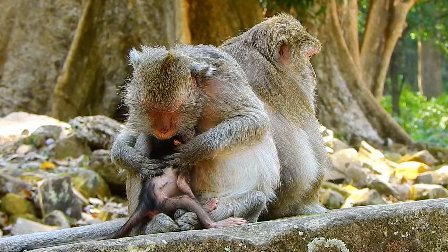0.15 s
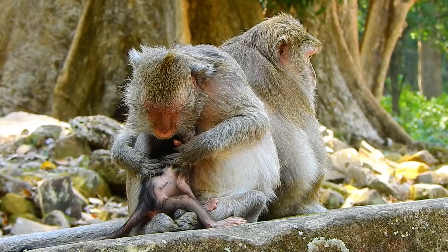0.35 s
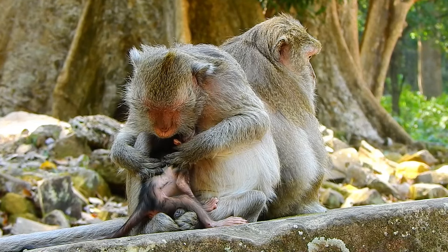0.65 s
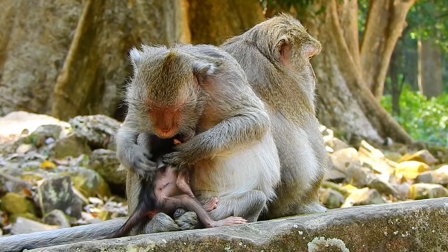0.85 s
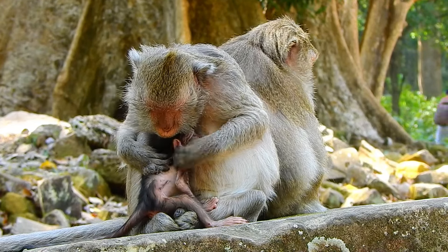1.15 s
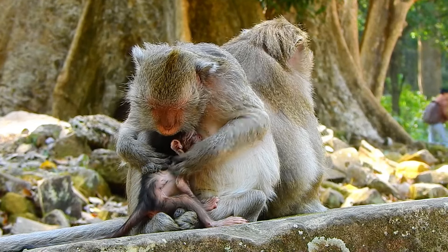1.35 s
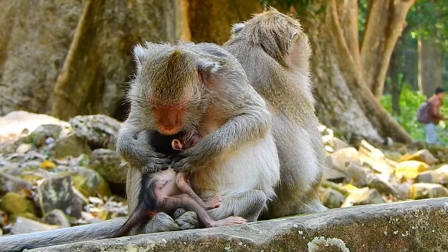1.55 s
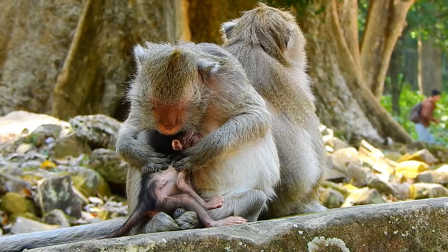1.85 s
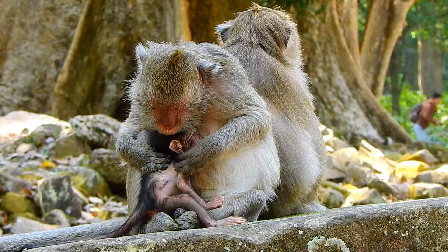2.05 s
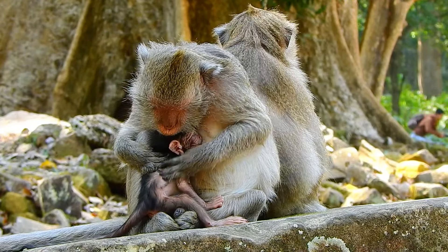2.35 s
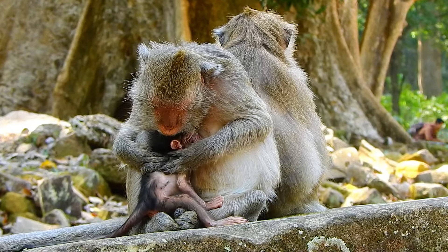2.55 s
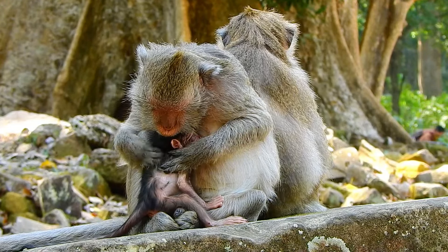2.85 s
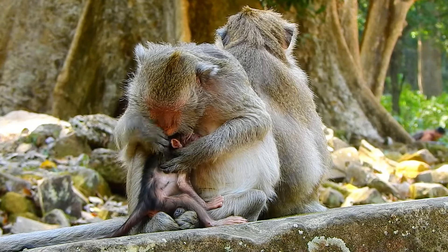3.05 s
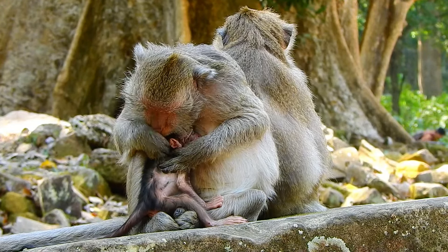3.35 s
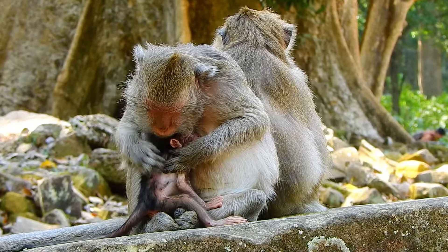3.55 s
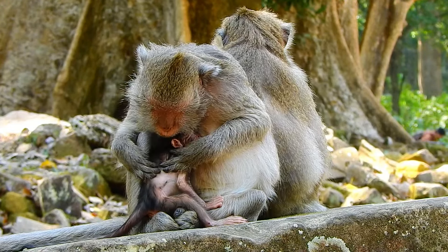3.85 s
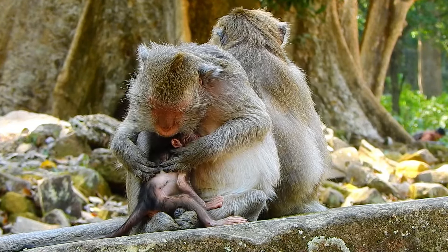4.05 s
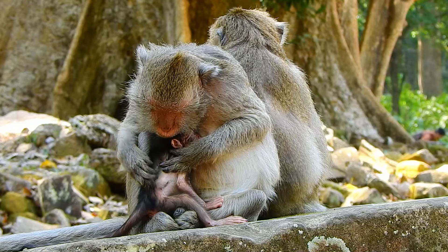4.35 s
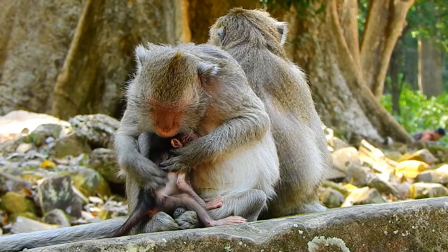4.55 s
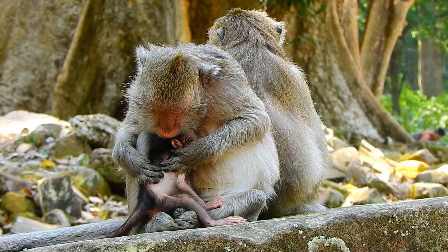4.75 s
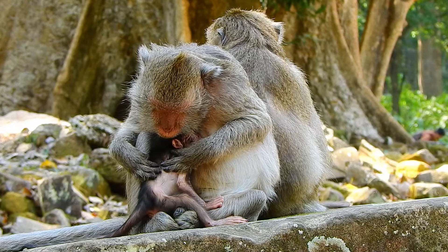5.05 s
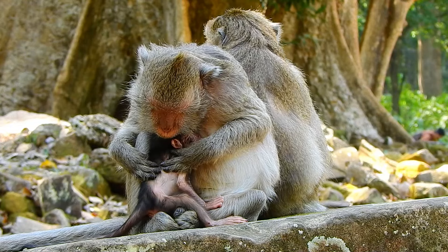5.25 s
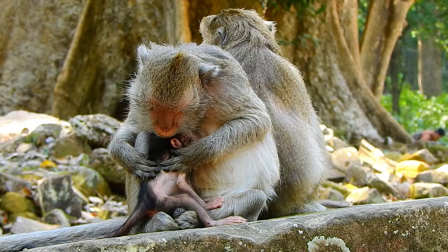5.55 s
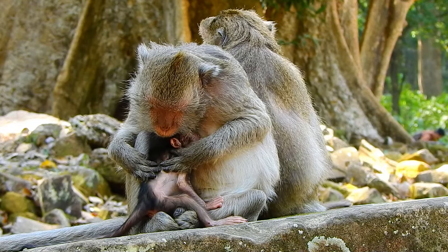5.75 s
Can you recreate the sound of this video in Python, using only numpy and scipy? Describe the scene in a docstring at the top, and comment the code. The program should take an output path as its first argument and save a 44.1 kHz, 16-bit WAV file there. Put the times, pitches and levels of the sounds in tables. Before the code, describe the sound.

Dry scuffs of fur and leaves, short piercing monkey squeaks, and scattered crisp clicks that grow louder later, close up in quiet, lightly echoing woodland.

```python
"""A rustling scuff opens over a very quiet hush; sharp smacks and ticks and thin squeaks near 3 kHz soon join it.
Macaques call and shift on fur, stone and dry leaves on a ledge, heard by a closely spaced microphone pair.
Scuffs are bursts of tiny slips; smacks and two squeak onsets are crackling impulses; all excite four resonances.
Squeaks and one clearer chirp are gliding sines roughened by random pitch and strength.
All but the hush feed a diffuse tail, made of fading noise, that lasts a third to half a second."""
import sys
import numpy as np
from scipy import signal
from scipy.fft import rfft, irfft, next_fast_len
from scipy.io import wavfile

SR = 44100
rng = np.random.default_rng(int(sys.argv[2]) if len(sys.argv) > 2 else 0)


def dump(signal):
    """Clip the signal to [-1, 1] and save it as 16-bit WAV at the path in sys.argv[1]."""
    limited = np.clip(np.atleast_2d(signal).T, -1, 1)
    pcm = np.round(limited * 32767).astype(np.int16)
    wavfile.write(sys.argv[1], SR, pcm)


N = 260631

# Spectrum of the still air, in relative level: frequency_hz, density_db
AIR_SPECTRUM = [(15, -5.5), (30, -2.5), (60, 3), (95, -2.5), (160, -16.5), (300, -13.5), (1000, -8.5),
                (3000, -6.5), (5000, -26.5), (7000, -30.5), (10000, -31), (15000, -39.5)]
# Left-right correlation of the still air: frequency_hz, correlation (-1 to 1)
AIR_CORRELATION = [(60, 0.9), (250, 0.52), (1000, 0.12), (3000, 0.092)]
AIR_DB = -76.5  # rms

# Rubbing contacts: start_s, length_s, level_db (before mix), rasp_hz, weight_db, left_minus_right_db
SCUFF_STROKES = [(-.045, 0.14, -47.5, 2960, 4.5, 2.5), (0.255, 0.077, -49.5, 3290, 2.5, 0),
                 (0.282, 0.15, -52.5, 3280, 8, 1.5), (0.373, 0.08, -41, 2930, 4.5, 0),
                 (.402, 0.11, -40, 3030, 9.5, 1), (0.594, 0.049, -55.5, 2950, 3, 3),
                 (.828, 0.087, -49, 3540, -23.5, 0), (1.08, .09, -55.5, 3190, 0.5, 7.5),
                 (1.269, 0.2, -60.5, 3520, 12, -.5), (1.412, 0.066, -47, 3180, 3, -1),
                 (1.508, 0.082, -61.5, 2830, -2, -8), (1.757, 0.095, -49.5, 2960, -1, 1.5),
                 (1.841, 0.16, -53.5, 3220, 1, 0), (2.438, 0.099, -59, 2850, -4.5, -5),
                 (2.681, 0.08, -74, 3300, 14, 6), (2.715, 0.22, -63.5, 3630, 8, -1.5),
                 (2.826, 0.14, -51.5, 3520, 3.5, 1.5), (2.997, .068, -31.5, 3150, -14, -1.5),
                 (3.207, 0.068, -50.5, 3100, 0.5, 4.5), (3.675, 0.16, -61.5, 2800, -1.5, 1.5),
                 (3.826, 0.24, -50, 3070, 1, 0.5), (4.166, 0.089, -73.5, 2900, 12.5, 4.5),
                 (4.321, 0.099, -41.5, 3180, -8, -7.5), (4.397, 0.15, -57, 3550, -10, -10),
                 (4.534, 0.11, -33.5, 3130, -2, -4), (4.665, .065, -60.5, 3240, 13, -5.5),
                 (4.78, 0.089, -57.5, 3100, 7.5, 5.5), (5.017, 0.071, -51.5, 2920, -2, 5),
                 (5.145, 0.2, -56, 3120, -4.5, 2), (5.295, 0.098, -47.5, 3160, -6, 4.5),
                 (5.518, .105, -47.5, 2820, 0.5, 3), (5.614, 0.099, -38.5, 2970, -1.5, 9.5)]
# Impulsive contacts, and the sharp onsets of two squeaks near 2.2 and 2.4 s:
# snap_s, level_db (before mix), ring_hz, weight_db, sharpness_db (extra hiss),
# crackle_decay_s, left_minus_right_db, left_lag_samples
SNAPS = [(.3829, -37, 3150, 18, 10.5, 0.0045, 1.5, -5.5), (.603, -54.5, 3150, 22.5, -2.5, 0.016, 7, 2.5),
         (.834, -49.5, 3270, -6, 18, 0.036, 2, 4), (1.099, -45, 3270, -5.5, 1.5, 0.0012, -7.5, -2.5),
         (1.173, -50, 2930, 5, -7, 0.0032, -0.5, 5.5), (1.284, -61, 3320, -4, 11.5, 0.0047, 10, 2.5),
         (1.422, -46.5, 3450, 8.5, 11.5, .012, -7, 0.5), (1.45, -49.5, 2660, 16.5, -9, .0033, -3.5, 3),
         (1.711, -45.5, 2930, -2.5, 1, 0.015, -6, 6.5), (2.197, -54.5, 2810, -6, -12.5, 0.042, -4, -3),
         (2.406, -33.5, 2990, -18.5, -10, 0.008, -7.5, 5), (2.459, -43, 2840, -20, -12, 0.029, -2, 4.5),
         (3.002, -28.5, 2710, -7, 0.5, 0.007, -6.5, 5), (3.221, -42, 3040, -7.5, -9, .0029, 2, 7),
         (3.4064, -23, 3130, -12.5, 0, 0.0018, -5.5, 5.5), (3.4132, -27, 3120, -21.5, 7, 0.00087, 1.5, 4.5),
         (3.537, -32, 3050, -13, -2, 0.01, -3, 6), (3.851, -47.5, 3380, 5, -9, 0.0011, -4, -4),
         (3.967, -33.5, 3000, 8.5, 0, 0.0077, 3, -5), (4.084, -45, 3030, -2.5, 0, 0.012, -4.5, 6.5),
         (4.43, -47.5, 3460, -1.5, 13, 0.0066, -11, 9.5), (4.549, -42, 3200, -12, 3.5, 0.061, -10, 7.5),
         (4.921, -58, 2820, 17, -17, 0.011, 6, 4), (5.127, -38, 3450, -13.5, -5, 0.0006, -15, 4),
         (5.355, -51.5, 3220, 18, 2, 0.0098, 24, 1), (5.53, -55, 2850, 17, 3, 0.00077, 2, -5.5),
         (5.64, -36, 3020, -7.5, -19, 0.0028, -1, -5.5), (5.673, -41.5, 2960, 2.5, 4, 0.001, -2, 4),
         (5.705, -28, 3020, -13.5, -2.5, .008, -4, 7)]
# Hoarse calls: start_s, rise_s, length_s, pitch_hz (mid-call), glide_hz_per_s, peak_db
SQUEAK_GLIDES = [(0.446, 0.024, .11, 3190, -1400, -42.5), (0.61, 0.034, 0.13, 3058, -1800, -53),
                 (0.667, 0.017, .09, 2760, -2400, -51), (1.095, .003, .009, 3126, -9000, -39),
                 (1.706, 0.0069, .055, 2914, -3500, -42.5), (2.175, 0.025, .11, 3030, -3300, -47),
                 (2.264, 0.063, 0.2, 2937, 2403.5, -63), (2.398, .01, .02, 2933, -6000, -35.5),
                 (4.084, 0.0067, .14, 3017, -2000, -57.5), (4.238, 0.028, 0.1, 3055, 3996, -62)]
# Path of the one clear chirp, which dips, swells and flicks upward: time_s, pitch_hz, level_db
CHIRP_PATH = [(.944, 3420, -57), (0.969, 3200, -47), (0.981, 3154, -41.5), (.998, 3342, -34.5),
              (1.004, 3575, -46.5), (1.014, 3750, -53.5), (1.03, 3340, -57)]

# Resonance mix at ordinary weight, relative to the sound's level: thud_db, body_db, ring_db, hiss_db
SCUFF_MIX = (-23.5, -10, -0.5, -16.5)
SMACK_MIX = (-34, -15.5, -1, -21.5)
# Gain per dB of weight, so that heavy sounds are duller and deeper: thud, body, ring, hiss [dB per dB]
TILT_PER_DB = (1.29, 0.58, 0.0021, -0.21)

# Decay time of the diffuse tail: frequency_hz, t60_s
TAIL_DECAY = [(300, 0.43), (1000, 0.38), (2000, 0.38), (3000, 0.33), (4500, 0.35), (8000, 0.47)]
# Colour of all but the still air at the microphones: frequency_hz, gain_db
MICROPHONE_COLOUR = [(110, 8.5), (260, -2.5), (450, 2.5), (560, 6), (620, -7.5), (860, 9), (1200, 2),
                     (1750, 2.5), (1950, 0), (2130, 6), (2400, -1), (3250, -1), (4000, -3.5), (5200, -5.5),
                     (8000, -7.5), (10000, -13.5)]

# Resonances of scuffs and snaps: band edges in Hz
THUD_HZ, DEEP_HZ, HISS_HZ, CRACK_HZ = (621, 880), (251, 530), (4523, 5510), (7000, 10900)
DEEP_DB = -8.5  # the deep part under a thud
BODY_HZ, BODY_SAG_HZ_PER_DB = 1523, 15.5  # the body's pitch sags with weight
BODY_SPREAD, RING_SPREAD = 1.298, 1.217  # upper band edge over centre

# A scuff is strongest this far through its stroke; heavy ones peak later
PEAK_SHARE, PEAK_SHARE_PER_DB = .39, .005
# Crackle builds before a snap, more slowly when it also lasts longer
BUILD_S, BUILD_SHARE, BRIEF_S = 0.0014, 0.093, .0025
# Louder snaps are nearer and so drier
SMACK_TAIL_DB, DRIER_PER_DB, TAIL_AT_DB = -5, 0.156, -41.5

SQUEAK_ROUGHNESS, CHIRP_ROUGHNESS = 0.59, 0.31  # 0-1
RASP_STRENGTH, RASP_HALF_WIDTH_HZ = .9, 220  # at full roughness, against the tone
TREBLE_HZ, CUTOFF_HZ = 10300, 15800


def from_db(db):
    """Amplitude gain is ten to the power of level over twenty."""
    return 10 ** (np.asarray(db) / 20)


def rms_one(x):
    """Normalization: division by the root mean square gives unit rms."""
    return x / np.sqrt(np.mean(x ** 2) + 1e-20)


def at_hz(points, hz):
    """Logarithmic frequency: a table is interpolated along equal frequency ratios."""
    table_hz, value = np.transpose(points)
    return np.interp(np.log(np.maximum(hz, 1)), np.log(table_hz), value)


def band(x, edges, order):
    """Resonance: a causal band-pass favours the force near its own frequency."""
    edges = np.sort(np.clip(edges, 20, .45 * SR))
    return signal.sosfilt(signal.butter(order, edges, "band", fs=SR, output="sos"), x)


def drift(size, rate):
    """Random modulation: normal values, drawn rate times a second, are joined by straight lines."""
    steps = np.arange(size) * rate / SR
    return np.interp(steps, np.arange(2048), rng.standard_normal(2048))


def add(out, s, sound):
    """Superposition: a sound sums into the field from time s on."""
    at = round(s * SR)
    sound, at = sound[:, max(-at, 0):], max(at, 0)
    out[:, at:at + sound.shape[1]] += sound[:, :N - at]


def panned(x, pan_db):
    """Level difference: a sound leans to one side at constant power."""
    sides_db = np.array([[pan_db], [-pan_db]]) / 2
    return x * rms_one(from_db(sides_db))


def pair(x, lag):
    """Arrival difference: linear phase delays the left microphone by lag samples against the right."""
    turn = np.exp(-1j * np.pi * np.arange(len(x) // 2 + 1) * lag / len(x))
    return irfft(rfft(x) * np.array([turn, 1 / turn]), len(x))


def swell(t, start, peak, end, rise_db, fall_db, edge_s=0.0022):
    """Exponential envelope: level rises to a peak and sinks linearly in dB, with soft ends."""
    edges = np.clip(np.minimum(t - start, end - t) / edge_s, 0, 1)
    return edges * from_db(np.interp(t, [start, peak, end], [-rise_db, 0, -fall_db]))


def still_air():
    """Partial coherence: shared and opposed noise make a faint even hush, more alike in the bass."""
    size = next_fast_len(N, real=True)
    hz = np.arange(size // 2 + 1) * SR / size
    mid, side = rfft(rng.standard_normal((2, size))) * from_db(at_hz(AIR_SPECTRUM, hz))
    alike = np.clip(at_hz(AIR_CORRELATION, hz), -1, 1)
    spectrum = np.sqrt(1 + alike) * mid + np.sqrt(1 - alike) * side * [[1], [-1]]
    return from_db(AIR_DB) * rms_one(irfft(spectrum, size)[:, :N])


def voices(force, body_hz, ring_hz):
    """Forced vibration: a force excites four broad resonances, thud, body, ring and hiss."""
    thud = band(force, THUD_HZ, order=2) + from_db(DEEP_DB) * band(force, DEEP_HZ, order=2)
    body = band(force, (body_hz / BODY_SPREAD, body_hz * BODY_SPREAD), order=2)
    ring = band(force, (ring_hz / RING_SPREAD, ring_hz * RING_SPREAD), order=3)
    return [thud, body, ring, band(force, HISS_HZ, order=2)]


def weighted_voices(force, mix_db, weight_db, ring_hz):
    """Spectral tilt: weight favours body and thud over hiss; returns (dB, sound) for each resonance."""
    body_hz = BODY_HZ - BODY_SAG_HZ_PER_DB * weight_db
    levels_db = np.add(mix_db, np.multiply(TILT_PER_DB, weight_db))
    return list(zip(levels_db, voices(force, body_hz, ring_hz)))


def scuffs(rise_db=12, fall_db=15, grain_db=3.5, patchy_db=3.0, grains_per_s=4000, grip_share=0.21):
    """Friction: rubbing sheds thousands of tiny uneven slips a second, scattered to both microphones."""
    out = np.zeros((2, N))
    sizes = from_db(grain_db * np.minimum(rng.exponential(1, (2, N)), 4))
    sizes = sizes * rng.choice([-1, 1], (2, N))
    slips = sizes * (rng.random((2, N)) < grains_per_s / SR)
    for start, length, level_db, rasp_hz, weight_db, pan_db in SCUFF_STROKES:
        t = np.arange(0, length, 1 / SR)
        peak = length * np.clip(PEAK_SHARE + PEAK_SHARE_PER_DB * weight_db, .1, .9)
        force = np.take(slips, np.arange(len(t)) + rng.integers(N), axis=1, mode="wrap")
        rub = 0
        for db, x in weighted_voices(force, SCUFF_MIX, weight_db, rasp_hz):
            # each resonance waxes and wanes by itself
            patchy_level_db = level_db + db + patchy_db * drift(len(t), 98.3)
            rub = rub + from_db(patchy_level_db) * rms_one(x)
        # a slow stroke also takes hold slowly
        stroke = swell(t, 0, peak, length, rise_db, fall_db, edge_s=grip_share * peak)
        add(out, start, panned(rub * stroke, pan_db))
    return out


def diffuse_tail(x, build_s=0.0044, bend=1.057, size=32768):
    """Diffuse decay: fading noise, different at each microphone, sinks in level slightly faster as it goes."""
    t, hz = np.arange(size) / SR, np.arange(size // 2 + 1) * SR / size
    white, response = rfft(rng.standard_normal((2, size))), 0
    edges = np.concatenate([[0], np.geomspace(400, 9000, 9), [SR]])
    for low, high in zip(edges, edges[1:]):
        t60 = at_hz(TAIL_DECAY, (low + high) / 2)
        fade = from_db(-60 * (t / t60) ** bend) * (1 - np.exp(-t / build_s))
        noise = irfft(white * (hz >= low) * (hz < high))
        response = response + noise * fade / np.linalg.norm(fade)
    return signal.fftconvolve(x, response, axes=1)[:, :N]


def smacks(crackle=0.75, scatter=0.086, echo=0.16, echo_s=0.0013, crack_db=-14, hard_db=-38,
           size=3584, lead_count=512):
    """Impulse response: for smacks, ticks and two squeak onsets, crackle builds to an impulse and dies away.

    Returns the direct sound and the tail's feed."""
    direct, spread = np.zeros((2, N)), np.zeros((2, N))
    t = (np.arange(size) - lead_count) / SR
    for s, level_db, ring_hz, weight_db, sharp_db, decay, pan_db, lag in SNAPS:
        time_constant = np.maximum(np.where(t < 0, BUILD_S + BUILD_SHARE * decay, decay), .0003)
        noise = rng.standard_normal((3, size)) * np.exp(-np.abs(t) / time_constant)
        loose = crackle * min(decay / BRIEF_S, 1)  # the briefest snaps are nearly one clean impulse
        off_ledge = echo * (np.abs(t - echo_s * rng.uniform(.7, 1.3)) < .5 / SR)
        near = pair((t == 0) + off_ledge + loose * noise[0], lag) + scatter * noise[1:]
        # rows: left, right, and the plain snap that goes out in all directions
        force = np.vstack([near, t == 0])
        mix_db = level_db + np.add(SMACK_MIX, [0, 0, 0, sharp_db])
        parts = weighted_voices(force, mix_db, weight_db, ring_hz)
        # the top octave weakens further in snaps whose hiss is below hard_db
        hiss_db = parts[-1][0]
        top_db = hiss_db + crack_db + .5 * min(hiss_db - hard_db, 0)
        parts.append((top_db, band(force, CRACK_HZ, order=2)))
        snap = 0
        for db, x in parts:
            # levels hold for the first hundredth of a second
            loudness = np.std(x[:, lead_count:lead_count + SR // 100], axis=1, keepdims=True)
            snap = snap + from_db(db) * x / loudness
        tail_db = SMACK_TAIL_DB - DRIER_PER_DB * (level_db - TAIL_AT_DB)
        add(direct, s + t[0], panned(snap[:2], pan_db))
        add(spread, s + t[0], snap[2:] * from_db(tail_db))
    return direct, spread


def whistle(hz, rough, jitter=.07, shimmer_db=5, overtone_db=-44, lag=-1.9):
    """Modulation sidebands: shaken pitch and strength widen a nearly pure tone to a narrow rasp."""
    size = len(hz)
    phase = 2 * np.pi * np.cumsum(hz * (1 + jitter * rough * drift(size, 700))) / SR
    slow = signal.butter(2, RASP_HALF_WIDTH_HZ, fs=SR, output="sos")
    flutter = rms_one(signal.sosfilt(slow, rng.standard_normal((2, size))))
    hoarse = RASP_STRENGTH * rough * (flutter[0] * np.sin(phase) + flutter[1] * np.cos(phase))
    tone = np.sin(phase) + hoarse + from_db(overtone_db) * np.sin(2 * phase)
    shimmer = from_db(shimmer_db * rough * drift(size, 250))
    return pair(rms_one(tone * shimmer), lag)


def squeaks(depth_db=15):
    """Linear frequency glide: each hoarse squeak slides straight in pitch as it swells and fades."""
    out = np.zeros((2, N))
    for start, rise, length, hz, glide, level_db in SQUEAK_GLIDES:
        t = np.arange(0, length, 1 / SR)
        strength = from_db(level_db) * swell(t, 0, rise, length, depth_db, depth_db)
        add(out, start, strength * whistle(hz + glide * (t - length / 2), SQUEAK_ROUGHNESS))
    return out


def chirp():
    """Frequency modulation: one clearer whistle dips, swells and flicks upward along a pitch path."""
    out = np.zeros((2, N))
    s, hz, db = np.transpose(CHIRP_PATH)
    t = np.arange(s[0], s[-1], 1 / SR)
    soft_ends = swell(t, s[0], s.mean(), s[-1], 0, 0)
    strength = from_db(np.interp(t, s, db)) * soft_ends
    add(out, s[0], strength * whistle(np.interp(t, s, hz), CHIRP_ROUGHNESS))
    return out


def close_pair(x, alike_hz=450):
    """Wavelength against spacing: long waves reach both microphones alike."""
    mid, side = (x[0] + x[1]) / 2, (x[0] - x[1]) / 2
    side = signal.sosfilt(signal.butter(1, alike_hz, "high", fs=SR, output="sos"), side)
    return np.array([mid + side, mid - side])


def coloured(x, size=511):
    """Minimum phase: the microphones' peaks and dips act as a causal filter."""
    hz = np.linspace(0, SR / 2, size)
    # squared, because the minimum-phase step takes the root of the magnitude
    squared_gain = from_db(at_hz(MICROPHONE_COLOUR, hz)) ** 2
    taps = signal.minimum_phase(signal.firwin2(size, hz, squared_gain, fs=SR))
    return signal.fftconvolve(x, taps[None], axes=1)[:, :N]


def scene(squeak_tail_db=-3.0, scuff_tail_db=-5):
    """Superposition in one space: scuffs, smacks and calls sum with their shared tail over the hush."""
    rustle = scuffs()
    snaps, snap_spread = smacks()
    calls = squeaks() + chirp()
    tail = diffuse_tail(from_db(squeak_tail_db) * calls + from_db(scuff_tail_db) * rustle + snap_spread)
    heard = coloured(close_pair(calls + rustle + snaps + tail))
    dull = signal.butter(8, TREBLE_HZ, fs=SR, output="sos")
    return signal.sosfilt(dull, heard) + still_air()


def record(dry):
    """Band limiting: a steep low-pass removes the top."""
    return signal.sosfilt(signal.ellip(10, .1, 80, CUTOFF_HZ, fs=SR, output="sos"), dry)


dry = scene()
out = record(dry)
dump(out)
```